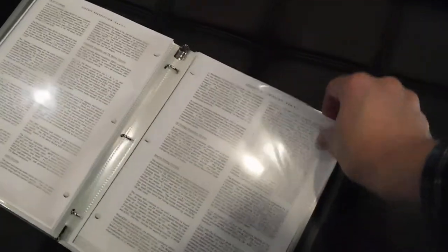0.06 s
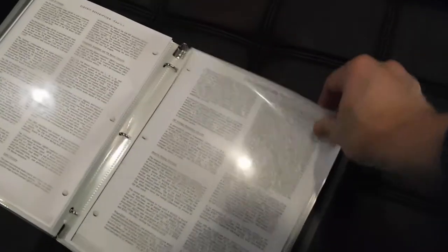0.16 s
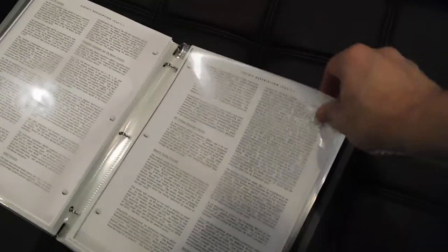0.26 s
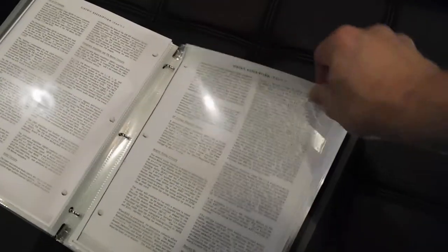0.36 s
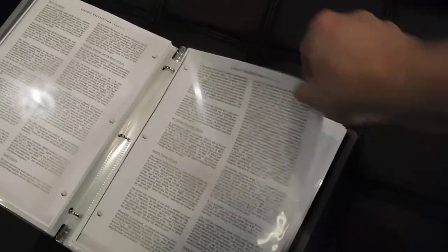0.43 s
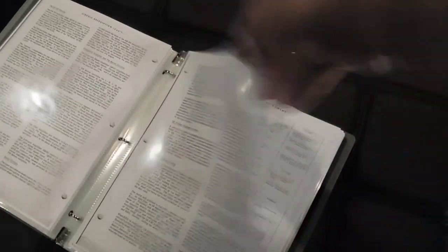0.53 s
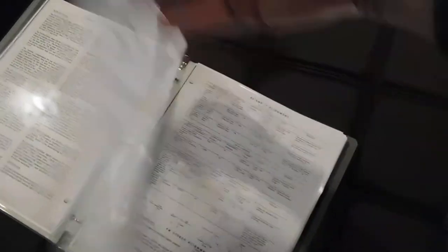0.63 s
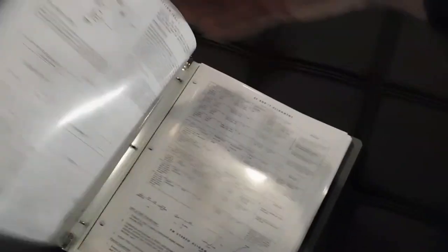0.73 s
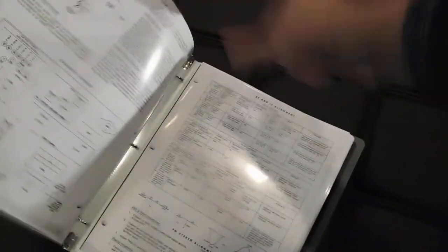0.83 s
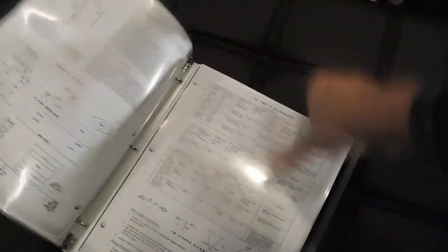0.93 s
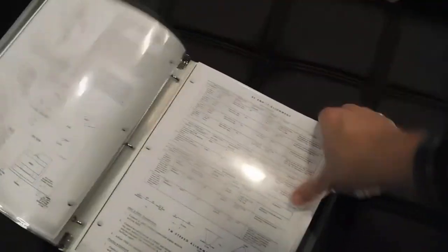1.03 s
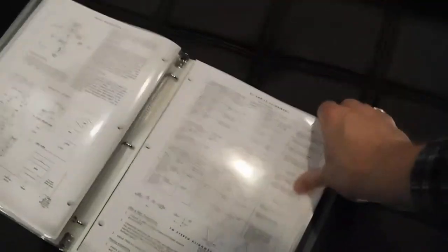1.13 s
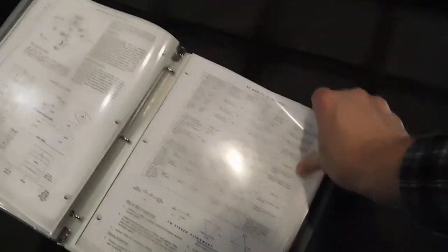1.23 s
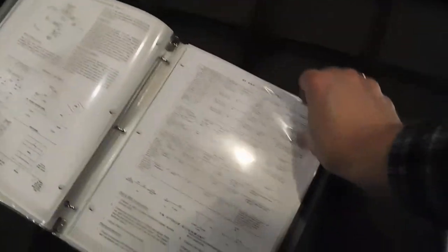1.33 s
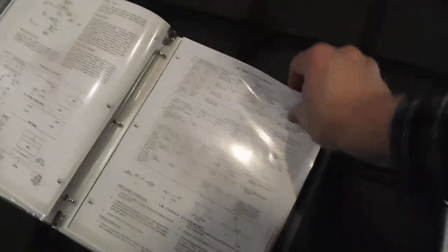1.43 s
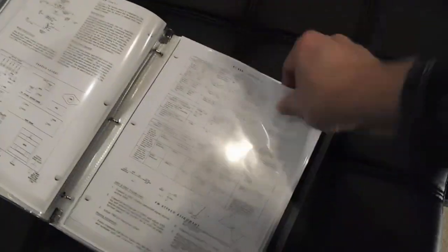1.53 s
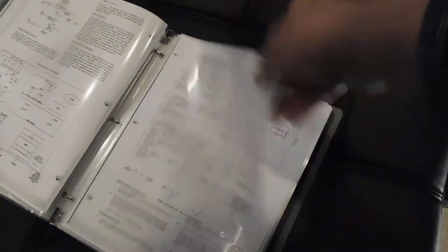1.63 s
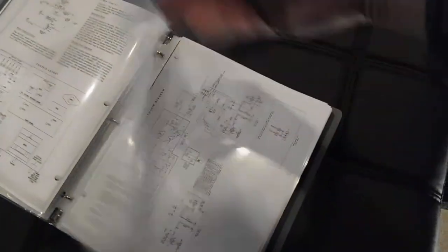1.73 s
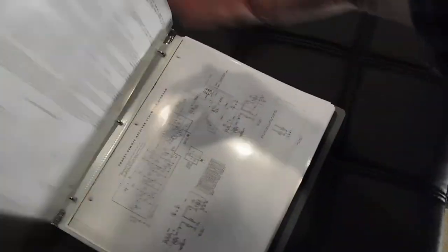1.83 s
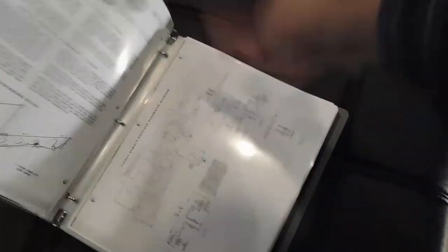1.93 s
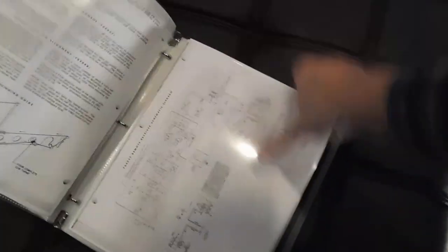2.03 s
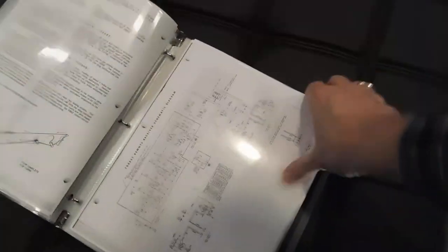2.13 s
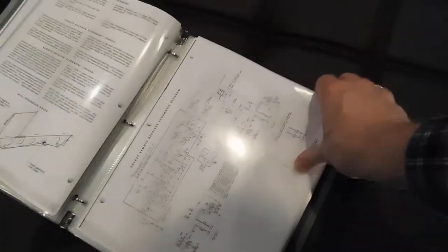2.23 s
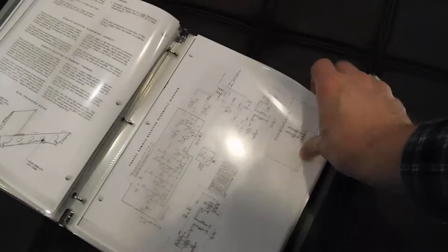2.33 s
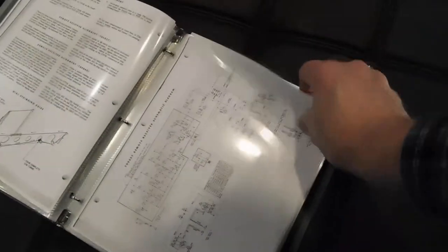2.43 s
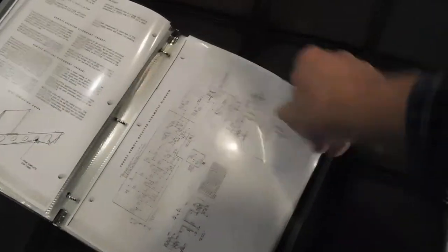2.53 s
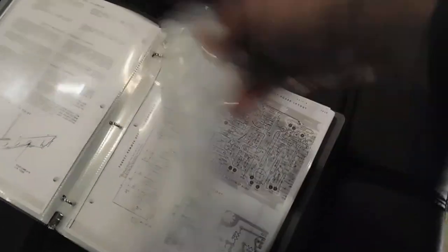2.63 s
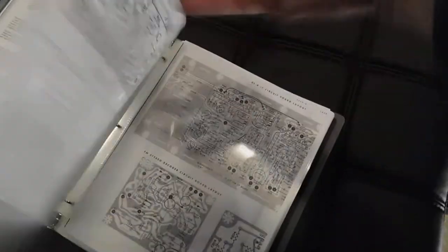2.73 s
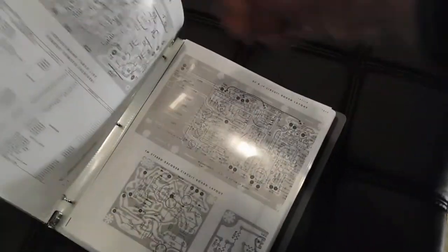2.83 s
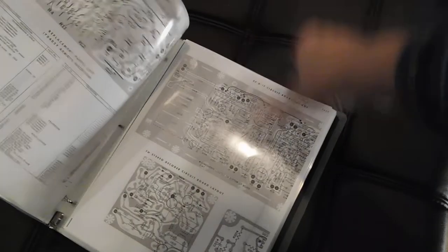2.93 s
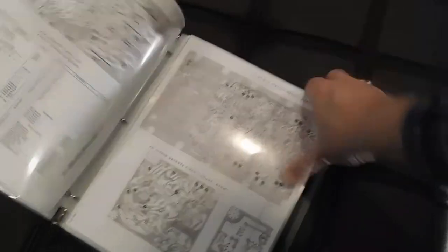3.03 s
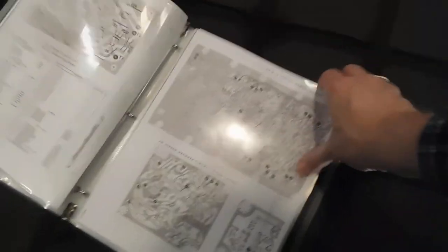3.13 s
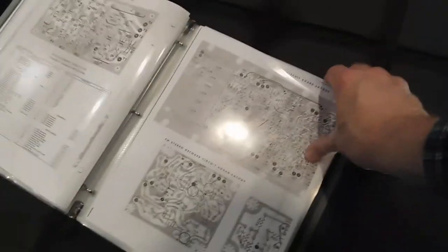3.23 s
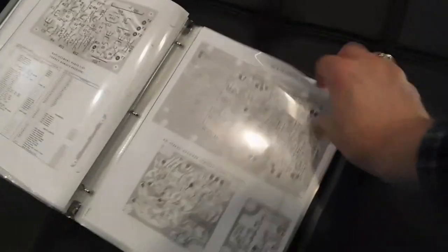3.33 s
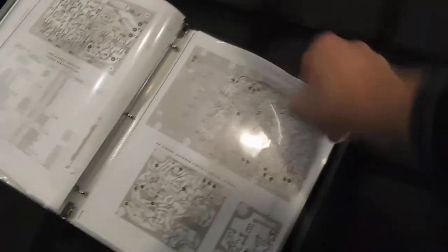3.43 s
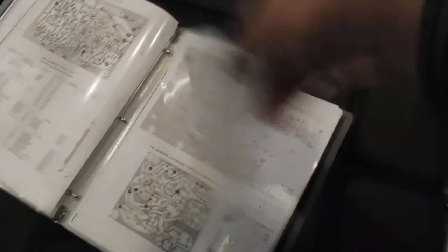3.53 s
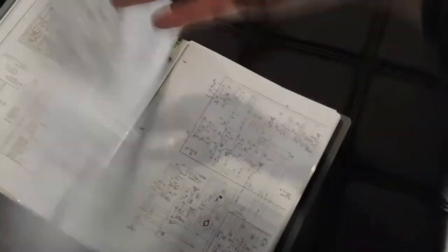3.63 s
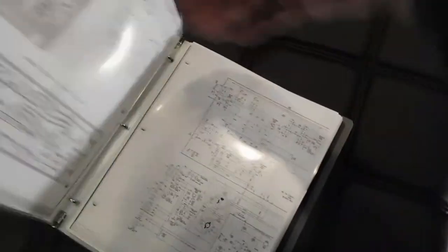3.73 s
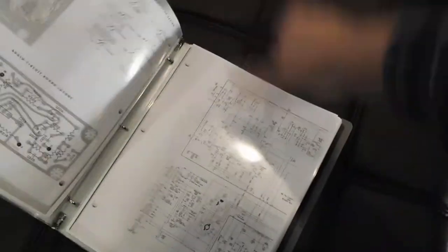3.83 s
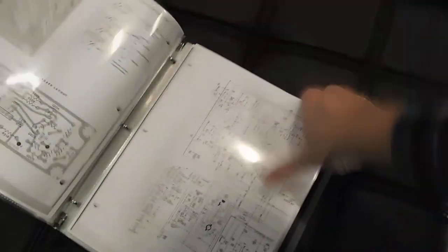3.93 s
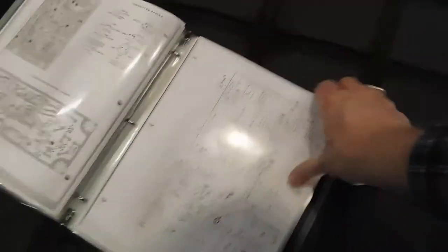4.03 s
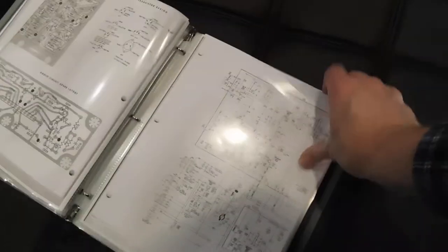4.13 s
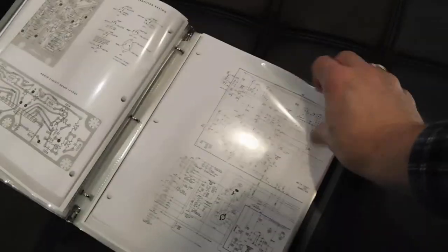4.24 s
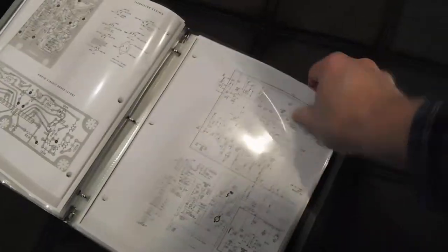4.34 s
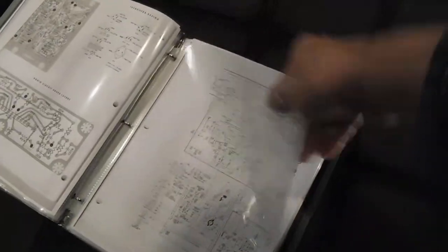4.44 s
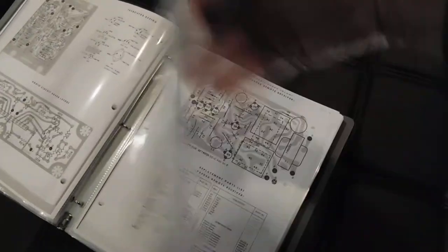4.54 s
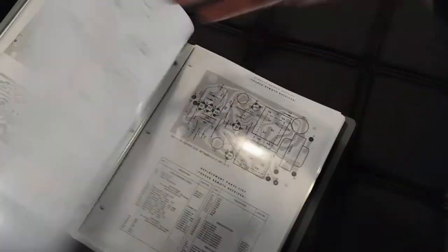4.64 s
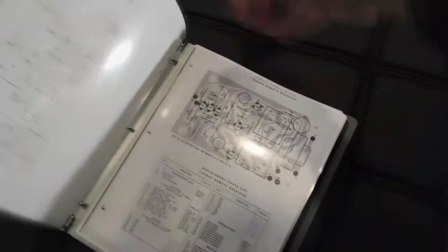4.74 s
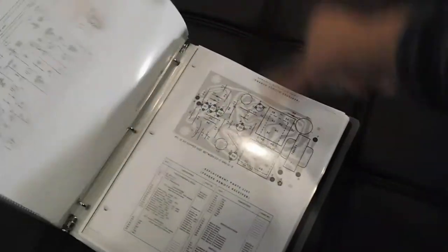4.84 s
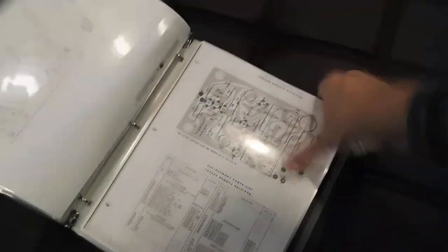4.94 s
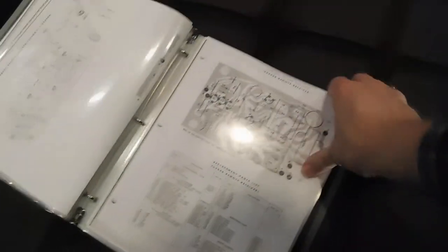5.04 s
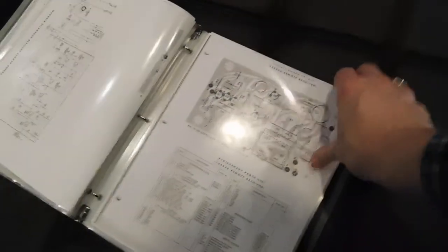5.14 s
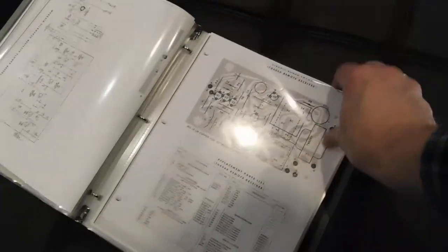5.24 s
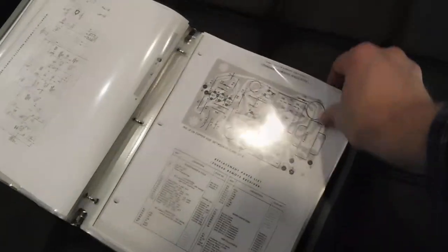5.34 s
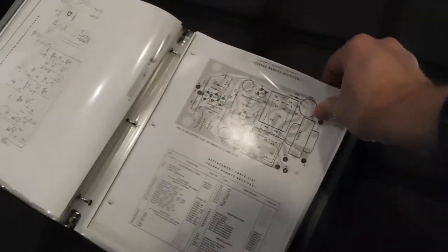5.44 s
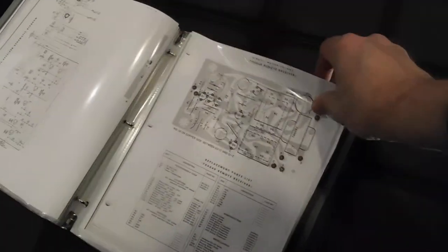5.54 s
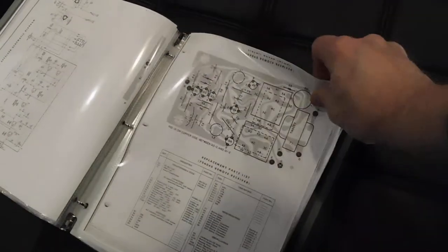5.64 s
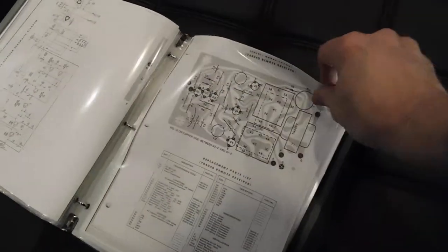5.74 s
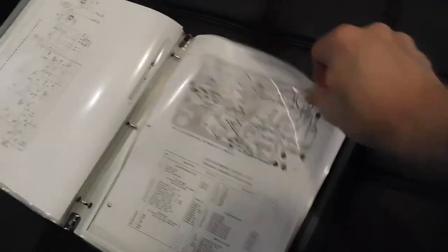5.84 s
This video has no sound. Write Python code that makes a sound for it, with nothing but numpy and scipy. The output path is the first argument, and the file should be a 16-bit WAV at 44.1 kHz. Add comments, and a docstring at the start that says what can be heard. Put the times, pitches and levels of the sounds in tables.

```python
"""Turning plastic sleeves

A hand turns ring-binder pages in clear plastic sleeves, close to a camera in a small quiet room.
The stiff film snaps as it buckles: a kick and a noise burst excite a short resonance.
It rustles as it slides and flaps: moving band levels shape grainy noise.
The hands knock softly on binder and camera as damped notes; sparse random reflections form the room's
short tail, over a steady hush of coloured noise."""
import sys
import numpy as np
from scipy import signal
from scipy.fft import rfft, irfft, next_fast_len
from scipy.io import wavfile
from scipy.ndimage import uniform_filter1d

SR = 44100
rng = np.random.default_rng(int(sys.argv[2]) if len(sys.argv) > 2 else 0)


def int16_out(signal):
    """Quantize to a 16-bit WAV file."""
    q = np.round(np.clip(np.atleast_2d(signal).T, -1, 1) * 32767)
    wavfile.write(sys.argv[1], SR, q.astype(np.int16))


N = 258955

# push, body, crack, snap and tick, the five bands of the film's sound: (low edge [Hz], high edge [Hz])
BANDS = [(130, 650), (650, 1400), (1400, 2800), (2800, 5500), (5500, 16000)]
EDGE_HZ = 16100  # upper limit of the sound
FRAME, OVERLAP = 512, 384  # short-time spectra [samples]
FRAME_HZ = np.fft.rfftfreq(FRAME, 1 / SR)


def amp(db):
    """Decibels to amplitude: 20 dB is a factor of ten."""
    return 10 ** (np.asarray(db) / 20)


def unit(x):
    """Normalization of power: scales to rms 1."""
    return x / np.sqrt(np.mean(x ** 2) + 1e-20)


def read(points, hz):
    """Interpolation along a logarithmic frequency axis."""
    f, value = np.transpose(points)
    return np.interp(np.log(hz + 1), np.log(f + 1), value)


def add(mix, s, sound):
    """Superposition: adds a stereo sound to the mix from time s [s]."""
    part = mix[:, max(0, round(s * SR)):][:, :sound.shape[-1]]
    part += sound[..., :part.shape[-1]]


def band(x, edges):
    """Causal band-pass filtering."""
    return signal.sosfilt(signal.butter(3, edges, "bandpass", fs=SR, output="sos"), x)


def ring(x, hz, q):
    """Second-order resonance with gain 1 at its peak."""
    return signal.lfilter(*signal.iirpeak(min(hz, EDGE_HZ), q, fs=SR), x)


def spectra(x):
    """Short-time Fourier analysis, shaped (channels, frames, bins)."""
    return signal.stft(x, nperseg=FRAME, noverlap=OVERLAP)[2].swapaxes(-1, -2)


def waves(z):
    """Short-time Fourier synthesis, by overlapping and adding frames."""
    return signal.istft(z.swapaxes(-1, -2), nperseg=FRAME, noverlap=OVERLAP)[1][:, :N]


def paired(z):
    """Spatial coherence: mixes two unrelated spectra into what two nearby microphone ports hear."""
    # likeness of the two ports: (frequency [Hz], coherence [0 to 1])
    likeness = [(60, 0.66), (300, 0.92), (600, 0.56), (1000, 0.86), (2000, 0.1), (4000, 0.057),
                (15000, 0.12)]
    same = np.clip(read(likeness, FRAME_HZ), 0, 1)
    return np.array([z[0], same * z[0] + np.sqrt(1 - same ** 2) * z[1]])


def octaves(hz):
    """Logarithmic pitch distance: how far the middle of each band lies above hz [octaves]."""
    return np.log2(BANDS).mean(1) - np.log2(hz)


def snaps():
    """Snap-through buckling of the sleeve: each snap stands out at its ring and falls off to both sides."""
    # one row a buckle: (time [s], length that scales its decay [s], ring [Hz], left over right [dB],
    # level before the band trims [dB], fall below the ring [dB/octave], fall above it [dB/octave])
    buckles = [(.0049, 0.0011, 1580, 10.5, -29.5, 7, 5), (0.0132, 0.0009, 1800, -5, -31, 10, 1.5),
               (0.0327, 0.0024, 3500, 2, -39, 5, 1), (.2076, .0015, 2080, -2, -40.5, 13, 12),
               (.3876, .0017, 2400, 6, -43, 10, 12), (0.4002, 0.0012, 2580, 1.5, -30, 8, 4),
               (.5649, .0015, 890, 2, -46.5, 6, 14), (0.6055, 0.0019, 3830, 2, -30.5, 9, 10),
               (.6095, 0.00066, 2070, 5, -23, 10.5, 5.5), (0.6118, 0.0019, 1750, 10, -26, 13, 8.5),
               (0.6166, 0.0037, 1500, 6, -40, 3.5, 12), (0.6827, 0.0013, 1270, 0, -30, 9, 12),
               (0.737, 0.0029, 4700, 2, -40.5, 2.5, 11), (0.7513, 0.00055, 4620, 0, -41.5, 5, 9),
               (0.761, 0.0011, 5200, 0, -44, 10, 10), (0.769, 0.0012, 7500, -2, -52, 3, 7),
               (.8517, 0.00057, 7500, 11, -47.5, 9, 8), (1.0964, .0017, 850, 1, -44, 8, 9),
               (1.1296, 0.0019, 1840, 9, -48.5, 3.5, 5), (1.162, .0016, 3520, 5, -47.5, 7, 3),
               (1.1768, .0006, 3100, -1.5, -35.5, 8.5, 2.5), (1.3815, 0.0021, 4650, 0, -45.5, 3.5, 11),
               (1.39, 0.0014, 2940, 0, -45.5, 5.5, 7), (1.567, 0.00078, 1500, 9, -48, 10, 2),
               (1.4646, 0.0014, 1800, 4, -40, 3.5, 7), (1.5879, 0.00066, 4500, -3, -13.5, 6.5, 20),
               (1.6016, 0.011, 2770, 0, -17.5, 16.5, 18), (1.6763, 0.0017, 1770, 0, -40, 5, 10),
               (1.716, .0042, 3430, 3, -44, 4, 5), (1.756, 0.0041, 1660, 0, -18.5, 14.5, 18),
               (1.76, 0.0053, 1480, -6, -26.5, 4.5, 9), (1.7848, 0.0038, 4230, -5, -33.5, 1.5, 1),
               (1.8355, .0013, 4570, -2, -45, 4, 11), (1.8601, .0004, 4930, 2, -30.5, 6, 12),
               (1.8627, 0.00073, 4800, 1, -32.5, 5.5, 12), (1.876, .0027, 4300, -2, -37, 2, 11),
               (1.8888, 0.00099, 4300, -1, -31, 2, 14), (1.8912, 0.0014, 1630, 1, -31, 6, 1.5),
               (1.9275, 0.00058, 1100, -3, -16.5, 7.5, 9), (1.9277, 0.00076, 4230, -1.5, -20.5, 12, 5.5),
               (2.1453, 0.00084, 1120, -1, -32.5, 13, 9.5), (2.284, 0.0015, 3600, 1, -44, 4.5, 6.5),
               (2.3272, 0.0022, 5860, 4, -41.5, 3.5, 7), (2.334, 0.0013, 3320, -0.5, -40, 5, 1.5),
               (2.3663, .0056, 4250, 1, -41, 4, 9), (2.4808, 0.0014, 7250, 0, -34.5, 5, 7),
               (2.509, .0013, 4500, -2, -44, 8, 11), (2.514, 0.0028, 1800, 1.5, -30, 8, 4),
               (2.5174, 0.00092, 2670, 1, -26, 17, 9), (2.527, 0.0023, 2930, 2, -22.5, 11, 11),
               (2.5407, .00057, 2050, 2, -34, 8, 6), (2.551, 0.00057, 2200, -3, -37, 12, 8),
               (2.559, 0.00057, 4130, -1, -33.5, 7, 15), (2.5813, 0.0027, 2400, 1, -30, 10, 8),
               (2.602, 0.0018, 2600, 0, -41, 9, 6), (2.6223, .001, 2580, 0, -36, 7, 9),
               (2.6247, 0.00074, 2120, 8, -36, 14, 4), (2.633, 0.00092, 2300, 3, -38, 8, 5),
               (2.641, 0.00085, 3350, 4, -39, 3.5, 6), (2.6536, 0.00017, 2380, 2, -22, 9, 11),
               (2.6598, 0.0044, 3500, 7, -30.5, 1.5, 3), (2.6657, 0.0022, 4140, -3, -27, 21, 5),
               (2.6757, 0.0021, 3800, -2.5, -21.5, 6.5, 5.5), (2.685, 0.00035, 4330, 10, -23.5, 9, 14),
               (2.7066, 0.0021, 3570, -7, -32, 5, 5), (2.7266, 0.0032, 1960, -2, -35, 4.5, 13),
               (2.7783, 0.0024, 3740, -2, -38.5, 2.5, 4.5), (2.8766, 0.0024, 840, -4, -49.5, 6, 0),
               (3.095, .001, 3500, -3, -54, 4, 2.5), (3.1375, 0.003, 1085, -1, -38, 12, 5.5),
               (3.1749, .0015, 3130, -1, -27.5, 6, 10.5), (3.175, .0024, 930, -5, -33.5, 4.5, 4),
               (3.299, .005, 7500, 3, -46.5, 5, 6), (3.3567, 0.0019, 3600, -3.5, -35.5, 5, 8),
               (3.424, 0.0018, 2450, 0, -45.5, 3, 5), (3.58, .0014, 2200, 0.5, -26, 5, 9),
               (3.6297, 0.0022, 4380, -3.5, -34, 11, 8), (3.64, 0.0028, 965, -1, -35.5, 11, 5),
               (3.66, 0.0014, 1980, 3, -41, 4, 7), (3.6833, 0.0022, 2980, 1, -40.5, 2, 7),
               (3.7129, 0.00097, 4700, 4, -34.5, 10, 6), (3.731, 0.00074, 4470, -4, -30.5, 3, 9),
               (3.7346, 0.0013, 4300, -2, -28.5, 3, 8), (3.83, 0.00053, 980, 5, -41, 9, 5),
               (3.959, .0015, 5150, 6, -48, 0.5, 8), (4.014, .002, 4500, 2, -53, 3, 2),
               (4.031, 0.0019, 4870, -2, -48.5, 2, 10), (4.0749, 0.00071, 3800, -1, -41.5, 7, 8),
               (4.1693, 0.0054, 4200, -2, -39.5, 18, 5), (4.296, .0054, 1070, 7, -42.5, 5, 3),
               (4.4722, 0.00066, 4150, 1, -31.5, 12, 5.5), (4.4807, 0.0012, 2960, 3, -24.5, 7.5, 19),
               (4.5828, 0.0069, 1930, -2, -34, 5.5, 2.5), (4.5975, 0.00088, 2830, 8, -27.5, 11, 13),
               (4.6144, .001, 1600, -1, -26, 10, 19), (4.633, 0.0011, 4600, 2, -39, 6, 8),
               (4.6558, 0.0012, 5070, 0, -34.5, 4.5, 11), (4.739, .0016, 3020, 1, -39.5, 4, 9),
               (4.7842, 0.0011, 780, -4, -26.5, 10, 4.5), (4.7845, 0.0012, 3760, 0.5, -29, 2.5, 8),
               (4.846, .0013, 5200, -8, -44, 3.5, 9), (4.9507, .0013, 4840, 1, -43, 10, 7),
               (4.987, 0.0039, 1700, 1, -42.5, 3, 4), (5.025, 0.0006, 4370, -1, -40, 7, 4),
               (5.0802, 0.00065, 890, -2, -38, 14, 8), (5.0803, 0.00082, 3700, -1.5, -34, 2.5, 10),
               (5.1324, 0.0014, 4050, -3, -41.5, 9, 6.5), (5.23, .0013, 3500, -2, -48, 7, 6),
               (5.2435, 0.0039, 3700, 0, -43, 3, 6), (5.323, 0.0009, 4100, -5.5, -44.5, 4, 9),
               (5.3434, 0.0027, 990, 1, -47, 9, 1), (5.3805, 0.001, 3400, -1, -50, 3, 5),
               (5.4837, 0.0015, 4070, 0, -49, 3.5, 9), (5.4884, 0.00031, 4120, 7, -35, 8.5, 12),
               (5.528, .0011, 4050, -1, -45, 4, 4), (5.5678, 0.00083, 4400, -4, -50, 13, 5),
               (5.6103, 0.0015, 2200, -1, -41.5, 5.5, 5.5), (5.644, 0.0012, 4630, 0, -50.5, 7, 6),
               (5.6867, 0.0009, 4730, 8, -46, 4.5, 3.5), (5.717, 0.0011, 4610, 2, -45, 4, 7),
               (5.752, 0.0011, 4400, 5, -40, 16, 8), (5.7846, .0012, 1100, 0, -44, 3, 0.5),
               (5.789, 0.0033, 1090, 1, -40.5, 3.5, 10)]
    trim_db = np.array([2, 1, .5, 1, 2])  # one a band
    focus_db, focus_octaves = 3, 1.0  # extra fall away from the ring, and how soon it sets in
    out = np.zeros((2, N))
    noises = rng.standard_normal((len(buckles), 2, 2048))
    for (s, length, hz, pan_db, db, below, above), noise in zip(buckles, noises):
        away = octaves(hz)
        fall_db = np.maximum(-below * away, above * away)
        fall_db = fall_db + focus_db * (1 - np.exp(-(away / focus_octaves) ** 2))
        add(out, s, buckle(noise, length, hz, db - fall_db + trim_db, pan_db))
    return out


def buckle(noise, length, hz, levels_db, pan_db=0):
    """Impulsive excitation of a resonator: a kick and a burst of tiny slips set a patch of film ringing."""
    # share of a snap's left-right lean in each band: short waves are beamed, long ones bend round:
    # one value a band (share [0 to 1])
    beaming = [0, .3, 1, 1, .5]
    kick, fade = 1.28, 1.66  # kick added to the first sample; decay constant [lengths]
    ring_db, width_hz = 9, 560
    stack_db, stack_hz, stack_q = 3, 310, 2.25
    apart, apart_hz = 0.97, 1700  # above this frequency the two ports hear a snap differently
    t = np.arange(noise.shape[1]) / SR
    slips, side = noise * np.exp(-t / (fade * length))
    slips[0] += kick
    # short waves leave the film differently toward each port
    side = apart * signal.lfilter(*signal.butter(3, apart_hz, "highpass", fs=SR), side)
    burst = np.array([slips + side, slips - side])
    burst = burst + amp(ring_db) * ring(burst, hz, hz / width_hz)
    # the stack of pages underneath answers with a dull, low note
    burst = burst + amp(stack_db) * ring(burst, stack_hz, stack_q)
    sound = np.zeros_like(burst)
    for db, beam, edges in zip(levels_db, beaming, BANDS):
        ports = np.array([unit(channel) for channel in band(burst, edges)])
        lean = unit(amp(beam * pan_db * np.array([[.5], [-.5]])))
        sound += amp(db) * ports * lean
    return sound * np.sqrt(.005 / t[-1])  # levels refer to the same energy spread over 5 ms


def crinkles(rubbing):
    """Random creasing: small creases give way more often and more loudly the harder the sleeve is rubbed."""
    # colour of a crease from push to tick: one value a band (relative level [dB])
    colour_db = [-37, -2, -7, 0, -17.5]
    # rate and level when the rubbing is at firm_db; follow is the exponent by which both track it
    per_s, level_db, firm_db, follow = 20, -52, -45.5, 0.44
    spread_db, ring_hz, spread_octaves = 1.5, 4100, 0.17
    length_s, count = 0.0018, 240  # count: candidate creases, of which some give way
    out = np.zeros((2, N))
    chances = rng.random((count, 2))
    characters = rng.standard_normal((count, 2))
    noises = rng.standard_normal((count, 2, 1024))
    for (when, luck), (loud, high), noise in zip(chances, characters, noises):
        force = (rubbing[int(when * N)] / amp(firm_db)) ** follow
        if luck < force * per_s * N / SR / count:
            crease = buckle(noise, length_s, ring_hz * 2 ** (spread_octaves * high), colour_db)
            add(out, when * N / SR, force * amp(level_db + spread_db * loud) * crease)
    return out


def rustle(levels):
    """Stick-slip friction: sliding film slips in tiny grains, and its resonances wander as it bends."""
    # colour of the sliding film: (frequency [Hz], relative level [dB])
    film_colour = [(120, -27), (220, -27), (310, 6.5), (520, -14.5), (850, 16), (1300, 11), (2000, 11),
                   (2700, 2), (3400, -6), (4600, -1), (5800, -8), (7500, -11.5), (9000, -16.5),
                   (15500, -17)]
    grains_per_s, spread_db, grain_s = 1100, 5.5, 0.00057
    patchy_db = 3.0  # rms wander of the resonances
    grainy = (.3, .4, .5, .52, .45)  # share of grains in each band
    trim_db = -1.5
    sizes = amp(spread_db * np.minimum(rng.exponential(1, N), 4))
    sizes = sizes * (rng.random(N) < grains_per_s / SR)
    crackle = unit(signal.lfilter([1], [1, -np.exp(-1 / (grain_s * SR))], sizes))
    z = paired(spectra(rng.standard_normal((2, N))))
    # smoothed over 14 frames and 5 frequency bins
    bends = uniform_filter1d(rng.standard_normal(z.shape[1:]), size=14, axis=0)
    bends = unit(uniform_filter1d(bends, size=5, axis=1))
    film = waves(z * amp(read(film_colour, FRAME_HZ) + patchy_db * bends))
    out = np.zeros((2, N))
    for level, share, edges in zip(levels, grainy, BANDS):
        grains = film * (1 - share + share * crackle)
        out += level * amp(trim_db) * unit(band(grains, edges))
    return out


def motion():
    """Addition of powers: slides, flaps and the resting hand together set the rustle's level in each band."""
    # the sleeve slides over the next one: (fastest at [s], rise [s], fall [s],
    # level before the band colour [dB], brightness at the peak [dB/octave])
    slide_rows = [(0, .01, 0.064, -33, -0.5), (.195, 0.16, 0.13, -46.5, 0), (.324, 0.075, 0.12, -52, -2.5),
                  (.404, 0.06, 0.067, -44, 2), (.544, 0.046, 0.023, -58, -4.5),
                  (.649, 0.057, 0.095, -40, -4), (.755, .03, 0.041, -56, 1), (.88, 0.034, .15, -61.5, 8.5),
                  (1.02, .15, 0.23, -59.5, 1.5), (1.167, 0.19, 0.074, -60, -2),
                  (1.388, 0.059, 0.046, -45.5, 1.5), (1.556, .19, 0.036, -48.5, 0),
                  (1.6, 0.041, 0.17, -37.5, 0.5), (1.777, 0.059, 0.095, -38, -3),
                  (1.881, .015, 0.047, -37, 4), (1.951, 0.093, 0.086, -39, 3),
                  (2.105, 0.068, 0.051, -51.5, 1.5), (2.22, 0.2, .12, -54, 1.5),
                  (2.405, 0.036, 0.12, -46, 1), (2.62, 0.17, .05, -43, 0.5),
                  (2.67, 0.028, 0.06, -28.5, -0.5), (3.143, 0.098, 0.11, -52.5, -1),
                  (3.384, 0.097, 0.15, -47.5, -1), (3.598, 0.069, 0.16, -42, -0.5),
                  (3.68, .04, 0.073, -58, 0), (3.958, 0.026, 0.19, -56.5, 0), (4.181, 0.027, 0.093, -47, 5),
                  (4.305, 0.05, 0.068, -48, 2.5), (4.47, 0.071, .04, -45.5, 3),
                  (4.53, 0.078, 0.11, -48.5, -0.5), (4.605, 0.14, 0.096, -41, 0),
                  (4.787, 0.034, .1, -48, 8), (4.96, 0.044, 0.62, -54, 0.5), (5.251, 0.046, 0.31, -52, 1),
                  (5.572, .15, 0.12, -52, 0), (5.745, 0.19, 0.091, -46, 1.5)]
    # the whole page flaps as it swings over and settles: (widest at [s], rise [s], fall [s],
    # level before the band colour [dB], brightness at the peak [dB/octave])
    flap_rows = [(.69, 0.1, .13, -46.5, 2.5), (.86, .1, 0.2, -65, -3.5), (1.052, 0.18, 0.12, -58.5, 0),
                 (1.37, 0.066, 0.11, -60, 4), (1.777, 0.045, 0.16, -40, 3), (1.94, .04, 0.22, -49, 1),
                 (2.11, .06, .08, -58.5, -3), (2.73, 0.22, 0.28, -48.5, 0.5),
                 (2.85, 0.12, 0.058, -44.5, .5), (3.04, .04, 0.091, -59.5, 2),
                 (3.135, 0.099, 0.11, -54, -1), (3.599, 0.049, 0.049, -42.5, -0.5),
                 (3.767, .12, 0.048, -46.5, 2), (4.04, 0.089, 0.08, -56, 3.5),
                 (4.305, 0.066, 0.06, -54, 0.5), (4.5, 0.058, 0.11, -51, 2), (4.797, .015, 0.072, -40.5, 2),
                 (4.949, 0.026, 0.047, -54, -3.5), (5.078, 0.23, 0.03, -54, -0.5),
                 (5.745, 0.038, 0.06, -51, 0)]
    # shares of push, body, crack, snap and tick in a slide: one value a band (relative level [dB])
    slide_colour_db = [-19.5, -5, -1, 1, -9]
    # the same in a flap: one value a band (relative level [dB])
    flap_colour_db = [3, 0, -14, -25, -21]
    # while the hand only rests on the page: one value a band (level before the rustle's trim [dB])
    resting_db = [-68.5, -67.5, -75.5, -69.5, -81.5]
    slide_hz, flap_hz = 4000, 600  # pivots of the brightness tilt
    slide_darkens_db, flap_darkens_db = 1, 1.5  # dB/octave from the peak to the end of the fall
    t = np.arange(0, N / SR, .001)
    slides = sum(stroke(t, row, slide_colour_db, slide_hz, slide_darkens_db) for row in slide_rows)
    flaps = sum(stroke(t, row, flap_colour_db, flap_hz, flap_darkens_db) for row in flap_rows)
    levels = np.sqrt(slides + flaps + amp(resting_db)[:, None] ** 2)
    return [np.interp(np.arange(N) / SR, t, level) for level in levels]


def stroke(t, row, colour_db, pivot_hz, darkens_db):
    """Exponential growth and decay of power in each band; the sound darkens as the bent film opens out."""
    stroke_db = 20  # climb in the rise time, and drop in the fall time
    s, rise, fall, db, bright_db = row
    # age: -1 at the start, 0 at the peak, 1 at the end
    age = np.clip((t - s) / np.where(t < s, rise, fall), -8, 8)
    tilt_db = bright_db - darkens_db * np.clip(age, -1, 1)
    level_db = db - stroke_db * abs(age) + np.array(colour_db)[:, None]
    return amp(level_db + np.outer(octaves(pivot_hz), tilt_db)) ** 2


def bumps():
    """Damped oscillation: a soft knock of the hand rings one dull note, with a puff of air."""
    # knocks on the binder and the camera body: (time [s], level of the note before rise and decay [dB],
    # pitch [Hz], decay by 60 dB [s], lag of the note at the left port [turns])
    knocks = [(0.318, -37, 272, 0.034, 0.00058), (1.276, -39.5, 118, 0.024, 0.22),
              (1.279, -45, 270, .03, 0.18), (1.466, -43, 417, 0.033, 0), (1.676, -47, 305, 0.069, 0.049),
              (3.026, -48, 293, 0.1, 0.026), (3.954, -35.5, 327, 0.025, 0.02),
              (4.942, -41, 318, 0.034, 0.064), (5.257, -46, 352, 0.1, 0.17)]
    rise_s, puff = 0.0022, 0.52
    t = np.arange(SR // 4) / SR
    out = np.zeros((2, N))
    for s, db, hz, t60, lag in knocks:
        air = unit(band(rng.standard_normal(len(t)), (hz / 2, hz * 2)))
        note = np.sin(2 * np.pi * (hz * t - np.array([[lag], [0]])))
        envelope = amp(db - 60 * t / t60) * (1 - np.exp(-t / rise_s))
        add(out, s, envelope * (note + puff * air))
    return out


def room(x):
    """Reverberation: separate early reflections crowd together as they age, and die band by band."""
    # reverberation time: (frequency [Hz], decay by 60 dB [s])
    decay = [(250, 0.2), (700, 0.2), (1800, 0.3), (4500, 0.18), (12000, 0.25)]
    wet_db, gap_s, build_s = -10.0, 0.0021, 0.0091
    first_per_s, crowding_s = 900, .035  # first reflection rate, and the age at which it has doubled
    t = np.arange(SR // 2) / SR
    per_s = np.minimum(first_per_s * (1 + (t / crowding_s) ** 2), SR)
    struck = rng.random((2, len(t))) < per_s / SR
    taps = rng.standard_normal((2, len(t))) * struck / np.sqrt(per_s)
    z = paired(spectra(taps))
    age = np.linspace(0, t[-1], z.shape[1])[:, None]
    tail = waves(z * amp(-60 * age / read(decay, FRAME_HZ)))[:, :len(t)]
    tail = tail * np.clip((t - gap_s) / build_s, 0, 1)
    return amp(wet_db) * signal.fftconvolve(x, unit(tail) / np.sqrt(len(t)), axes=1)[:, :N]


def still_air():
    """Stationary coloured noise: the steady hush of the room."""
    # colour of the hush: (frequency [Hz], relative spectral density [dB])
    air_colour = [(5, -10), (14, -2), (26, -7), (36, -7), (50, -7), (80, -10), (190, -11), (310, -5),
                  (500, -8), (850, -5), (1900, -9), (2500, -12), (4400, -13), (8000, -22), (16000, -27)]
    level_db = -61.0  # rms
    hz = np.fft.rfftfreq(N, 1 / SR)
    hush = waves(paired(spectra(rng.standard_normal((2, N)))))
    return amp(level_db) * unit(irfft(rfft(hush) * amp(read(air_colour, hz)), N))


def scene():
    """Superposition of direct sound, reflections and hush: sleeves and fingers in the quiet room."""
    rustle_send, turn_hz = 0.66, 1.1
    levels = motion()
    hits = snaps() + crinkles(levels[2]) + bumps()  # levels[2]: the crack band
    sliding = rustle(levels)
    sent = hits + rustle_send * sliding
    # two random room tails fade in and out in turn, so the reverberation's colour keeps changing
    turn = 2 * np.pi * turn_hz * np.arange(N) / SR
    reflections = room(sent * np.cos(turn)) + room(sent * np.sin(turn))
    return hits + sliding + reflections + still_air()


def record(dry):
    """Minimum-phase filtering gives each port its colour; then peaks saturate and the band is limited."""
    # difference between the ports, largest where the left one rings: (frequency [Hz], left over right [dB])
    port_difference = [(60, 1.5), (700, 1.5), (1300, 2.5), (2300, 5), (3300, 5), (4300, 14), (5800, 6),
                       (8000, -0.5), (15000, -5.5)]
    # colour shared by both ports: (frequency [Hz], relative level [dB])
    shared_colour = [(100, 3.5), (200, -2), (330, 0), (520, -1), (750, 1), (1300, -2), (2000, 4),
                     (2800, -3.5), (3400, 2), (4200, 0), (5800, -1.5), (7500, 0.5), (10000, -0.5),
                     (15000, -2)]
    ceiling = .9
    size = next_fast_len(N + 4096)
    hz = abs(np.fft.fftfreq(size, 1 / SR))
    ratio = amp(read(port_difference, hz))
    balance = np.array([ratio, np.ones(size)]) * np.sqrt(2 / (1 + ratio ** 2))  # keeps the mean power
    log_gain = np.log(balance * amp(read(shared_colour, hz)))
    # the Hilbert transform of the log gain supplies the phase of a causal filter
    response = np.exp(np.conj(signal.hilbert(log_gain)))
    heard = np.fft.ifft(np.fft.fft(dry, size) * response).real[:, :N]
    heard = heard / (1 + (heard / ceiling) ** 8) ** (1 / 8)
    low_pass = signal.firwin(255, EDGE_HZ, window=("kaiser", 9), fs=SR)
    return signal.oaconvolve(heard, low_pass[None], "same")


dry = scene()
out = record(dry)
int16_out(out)
```